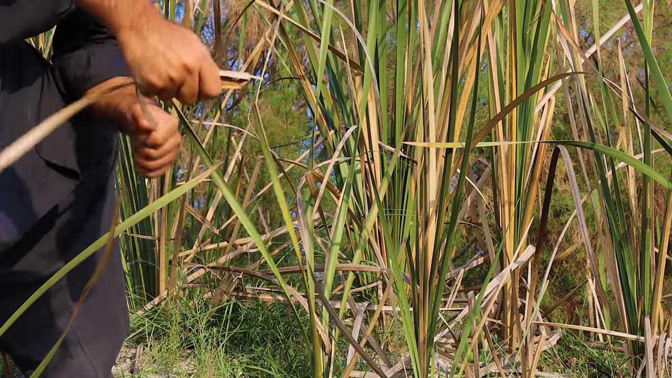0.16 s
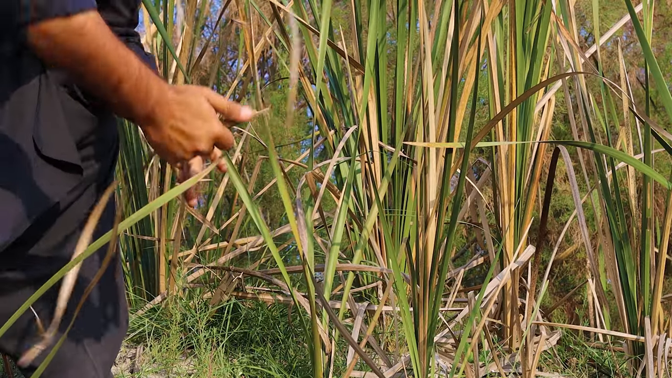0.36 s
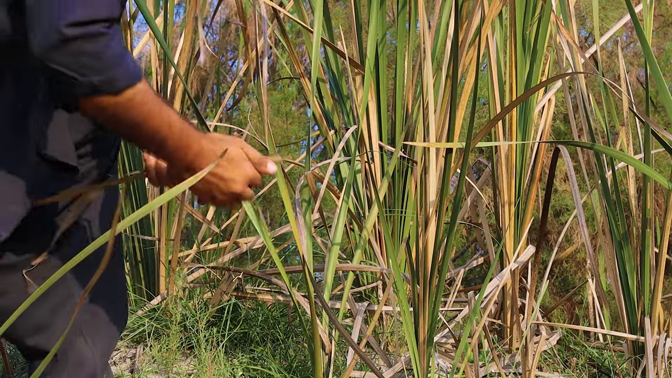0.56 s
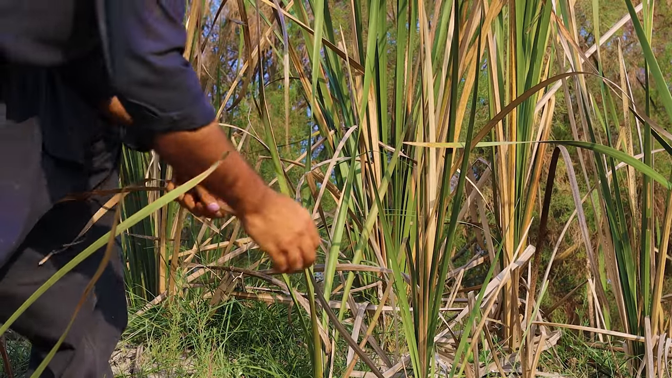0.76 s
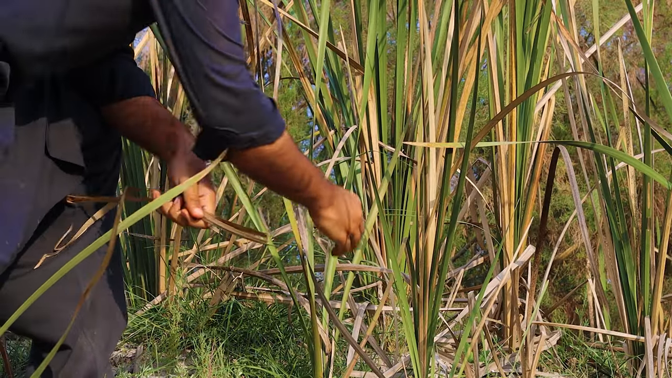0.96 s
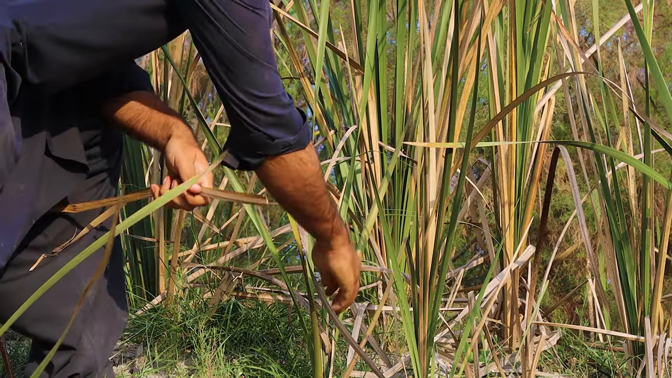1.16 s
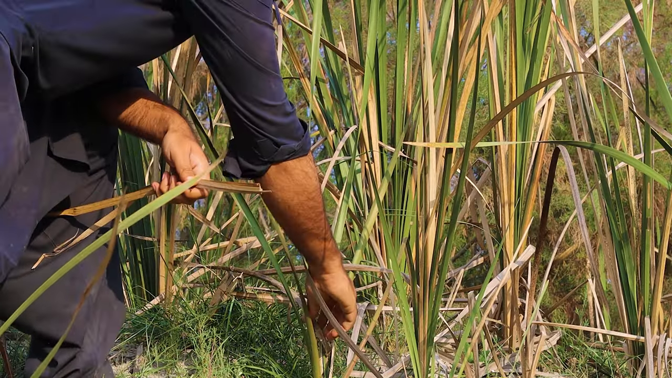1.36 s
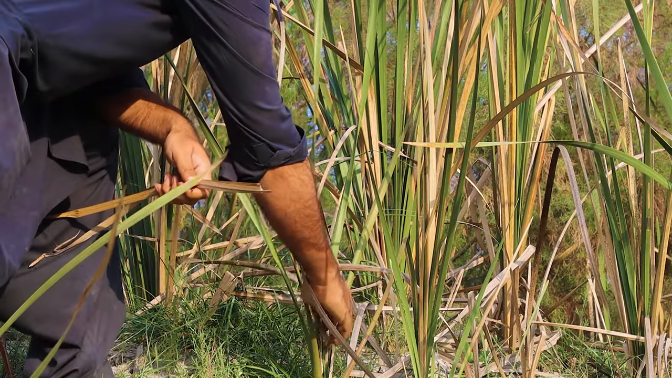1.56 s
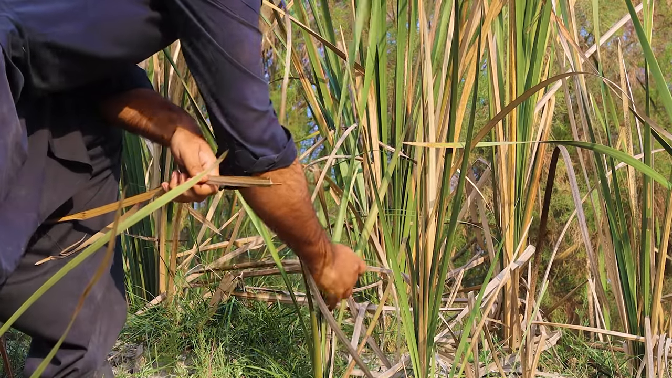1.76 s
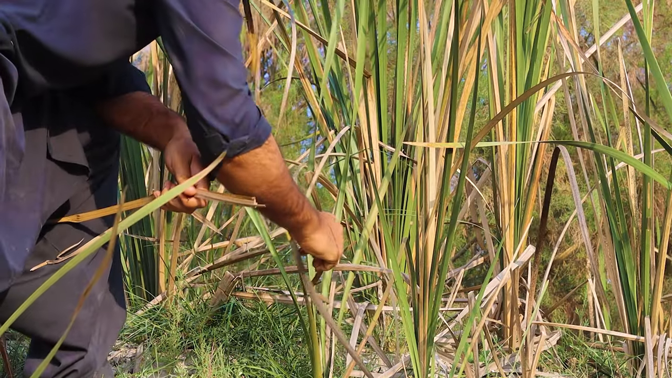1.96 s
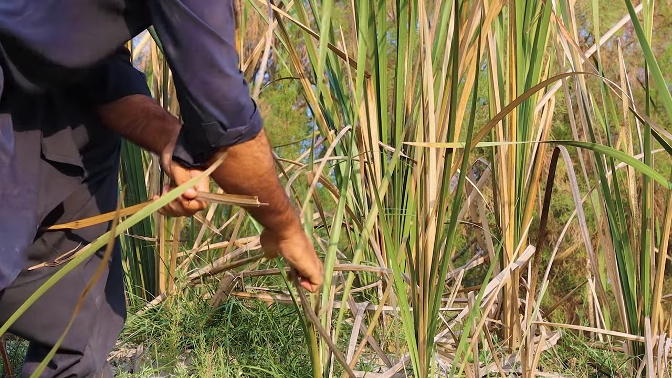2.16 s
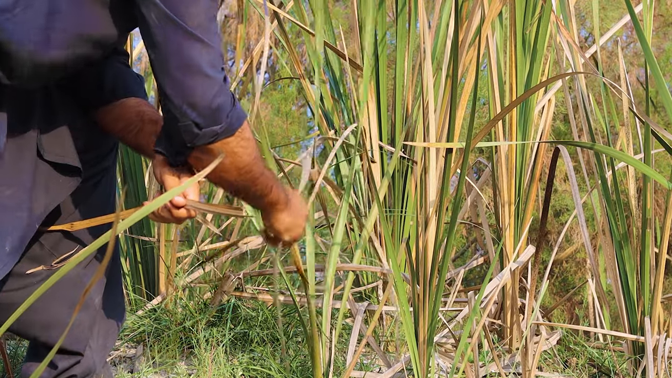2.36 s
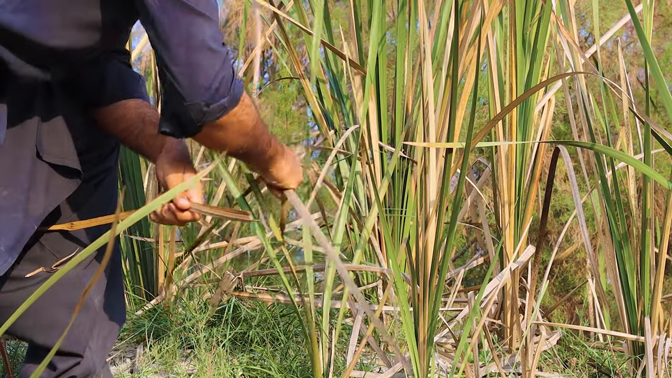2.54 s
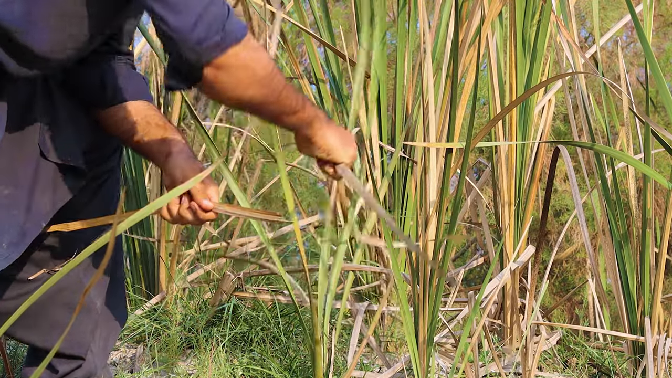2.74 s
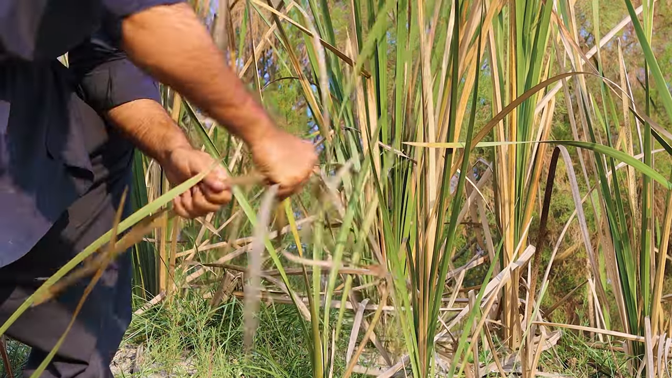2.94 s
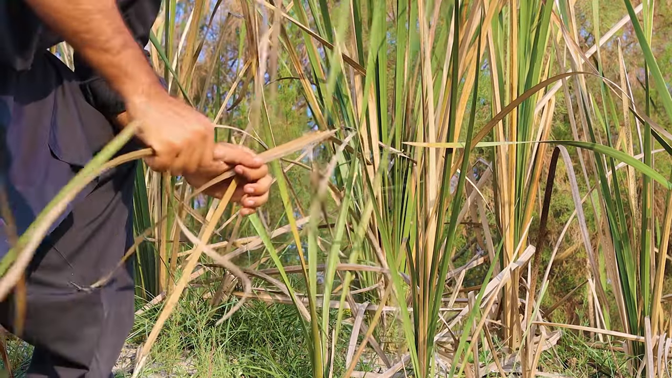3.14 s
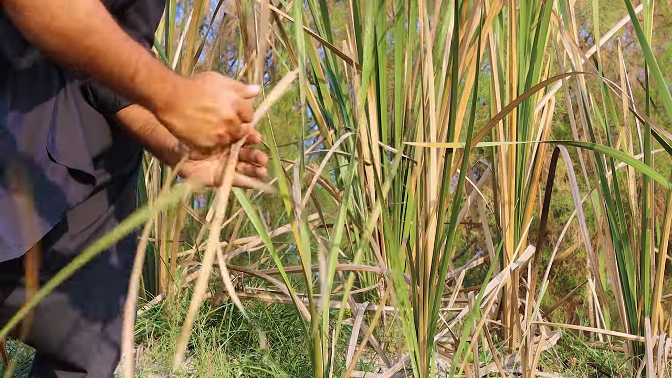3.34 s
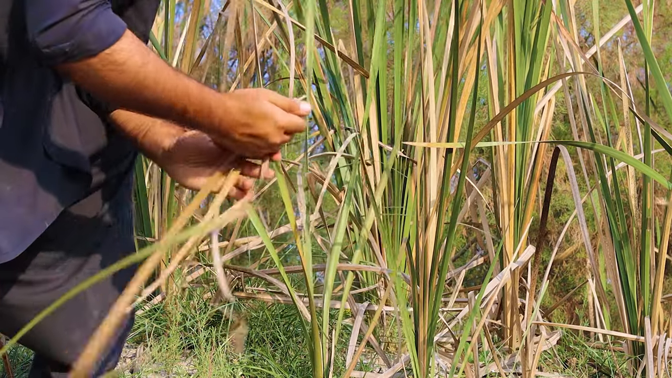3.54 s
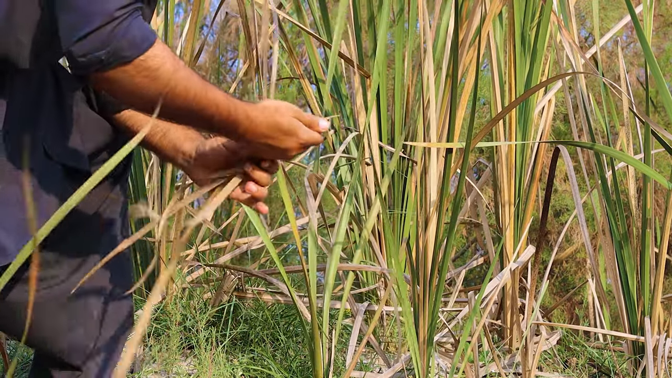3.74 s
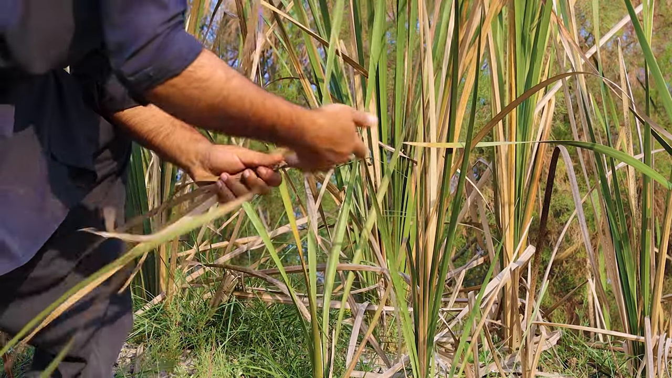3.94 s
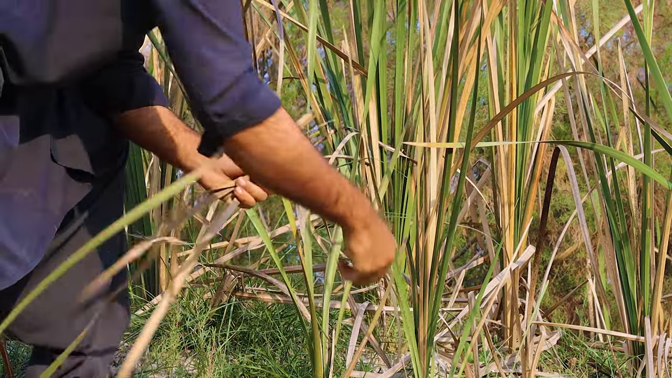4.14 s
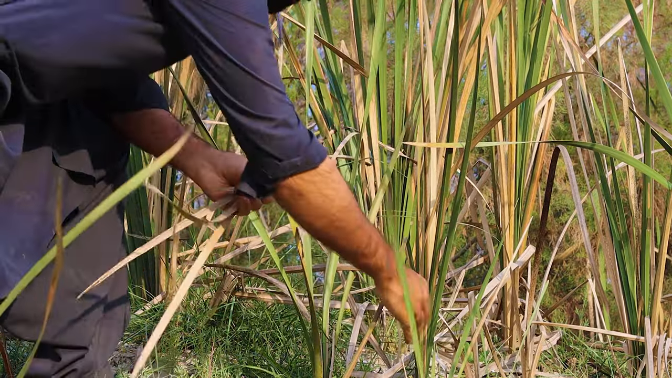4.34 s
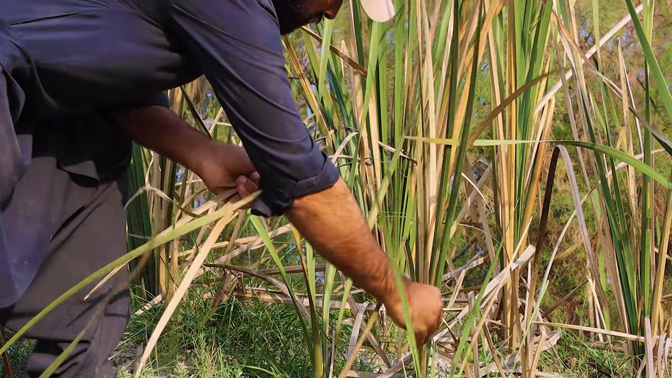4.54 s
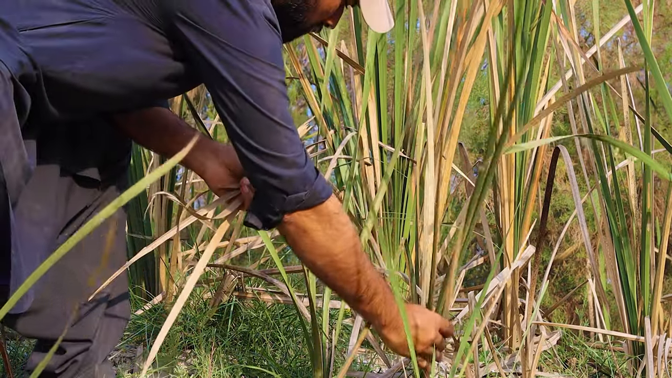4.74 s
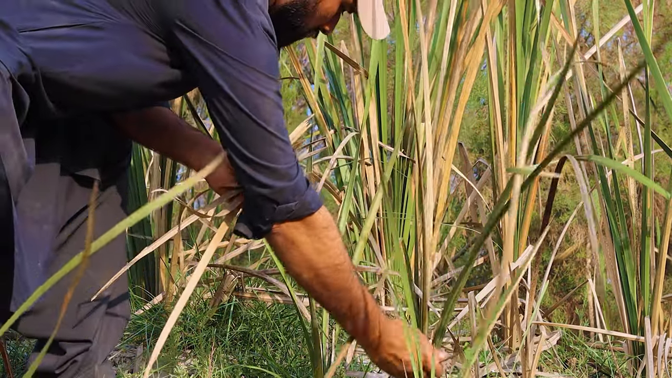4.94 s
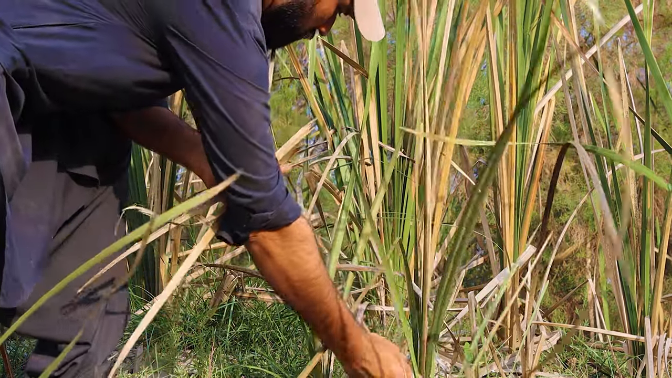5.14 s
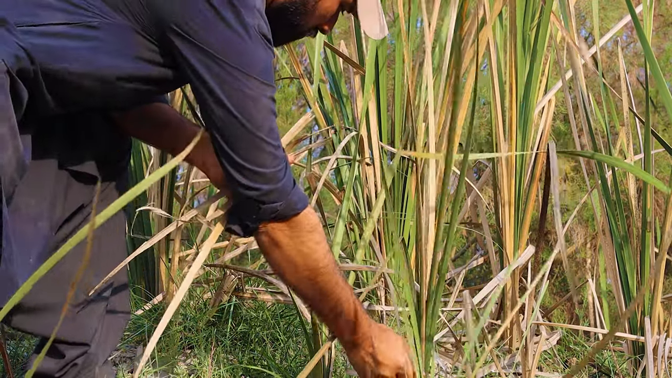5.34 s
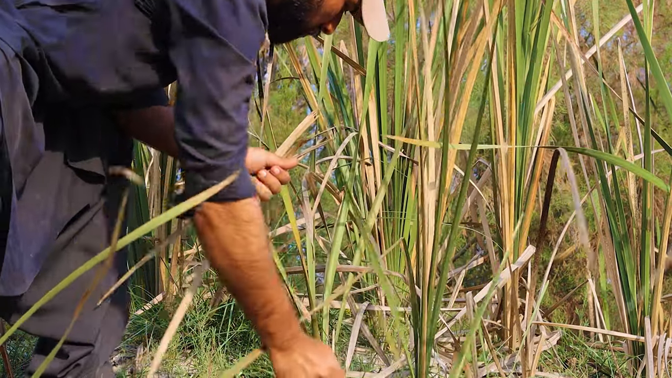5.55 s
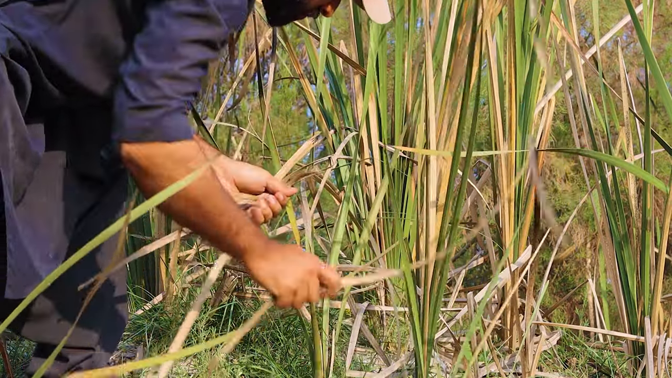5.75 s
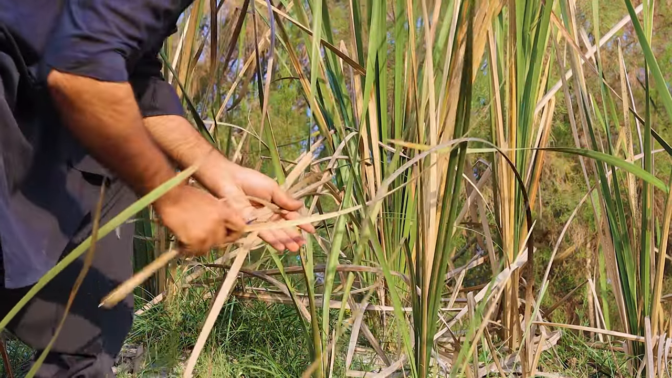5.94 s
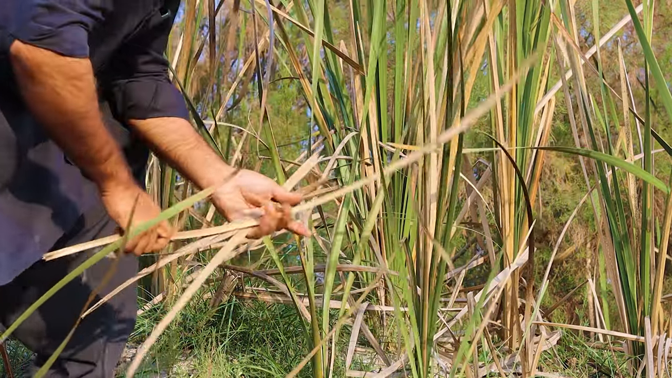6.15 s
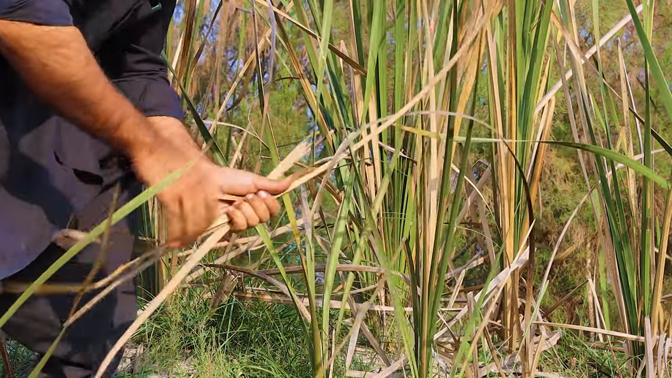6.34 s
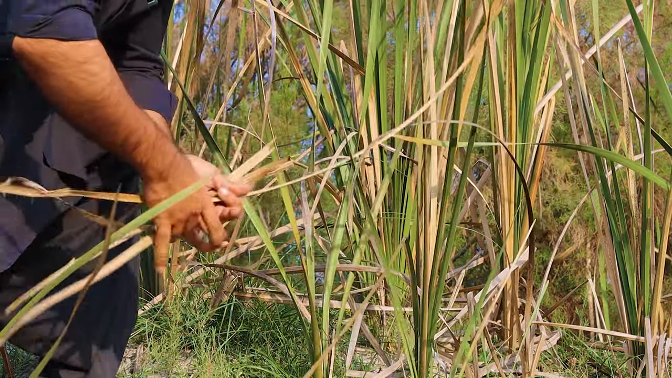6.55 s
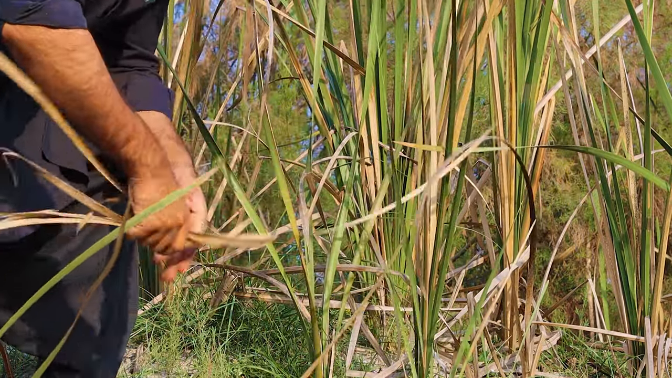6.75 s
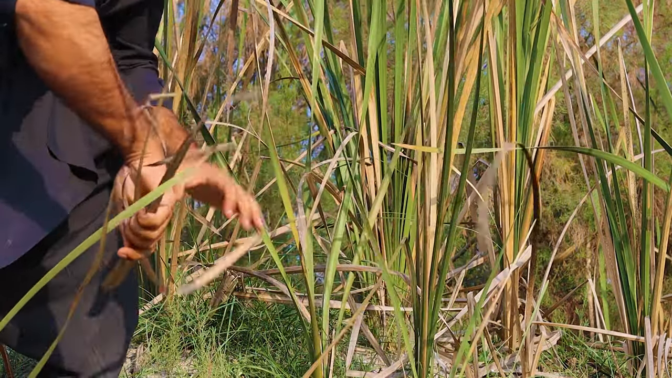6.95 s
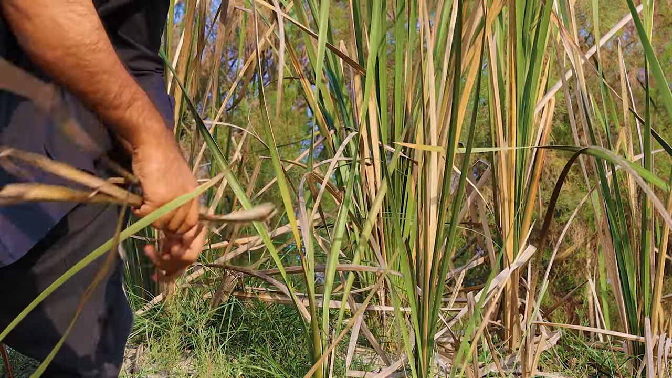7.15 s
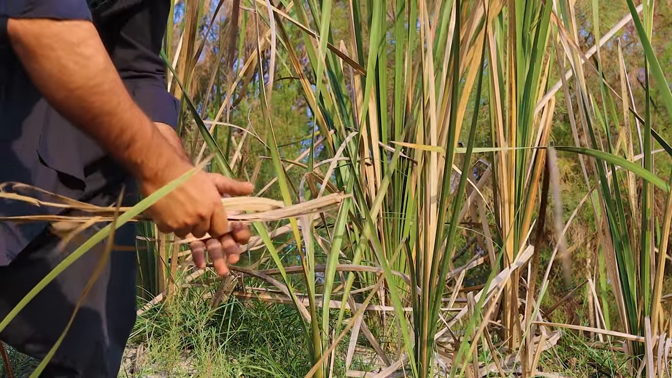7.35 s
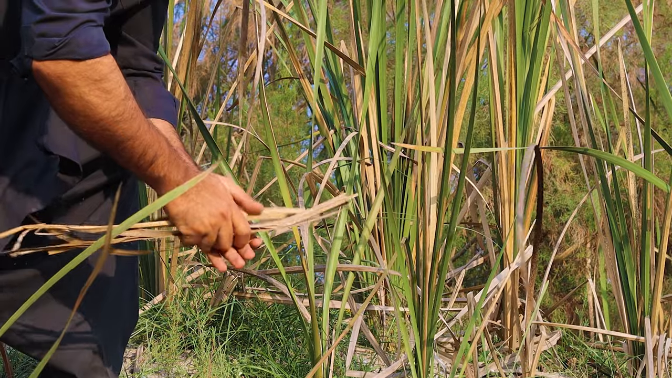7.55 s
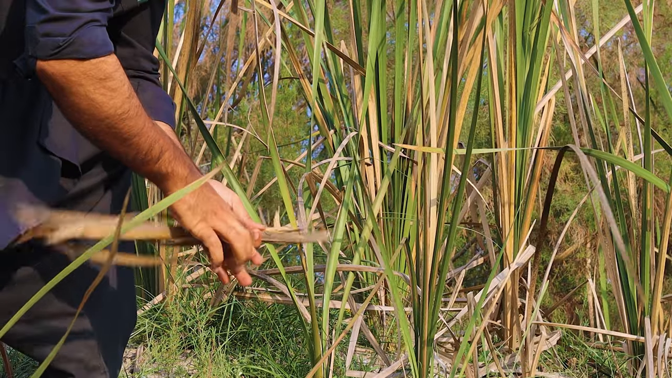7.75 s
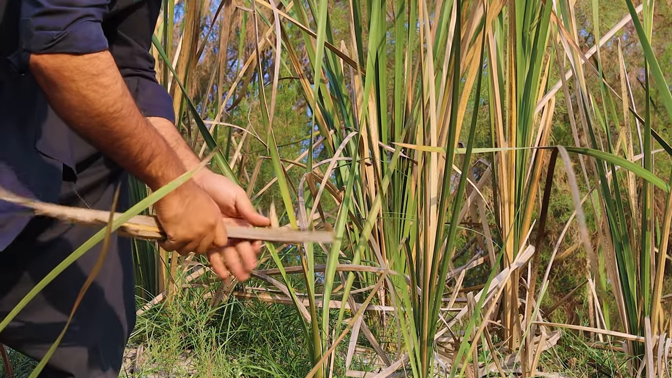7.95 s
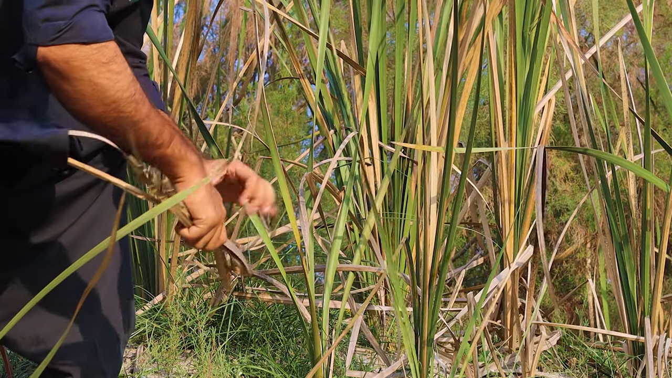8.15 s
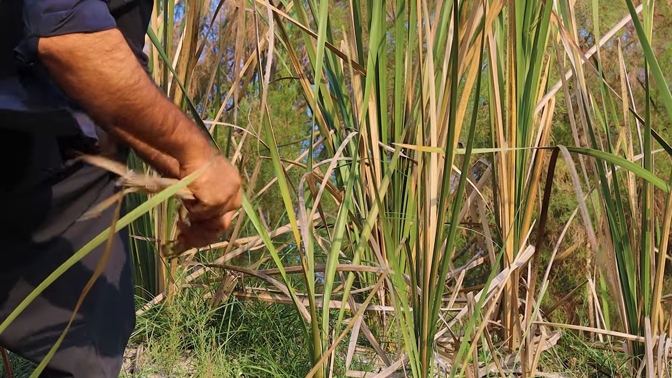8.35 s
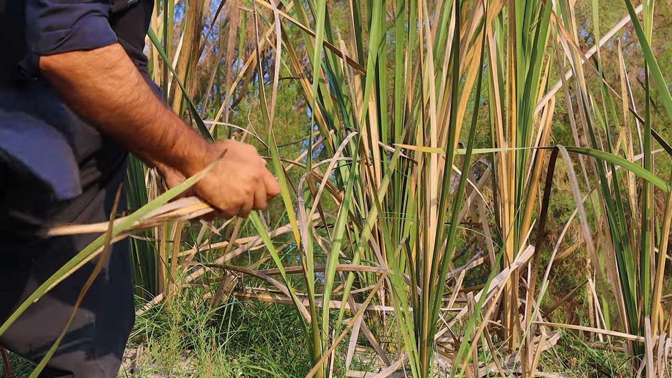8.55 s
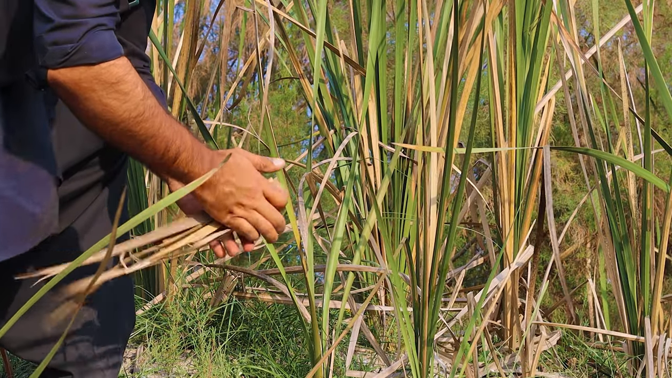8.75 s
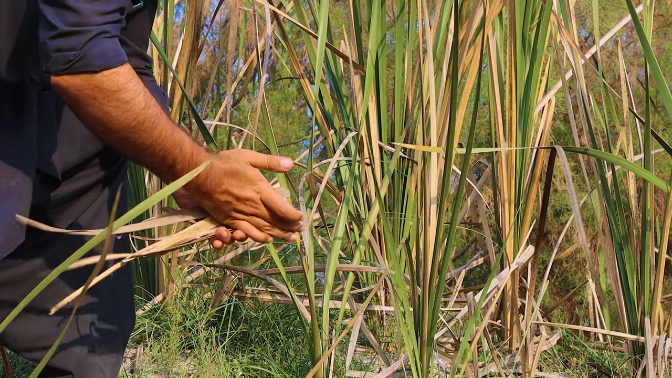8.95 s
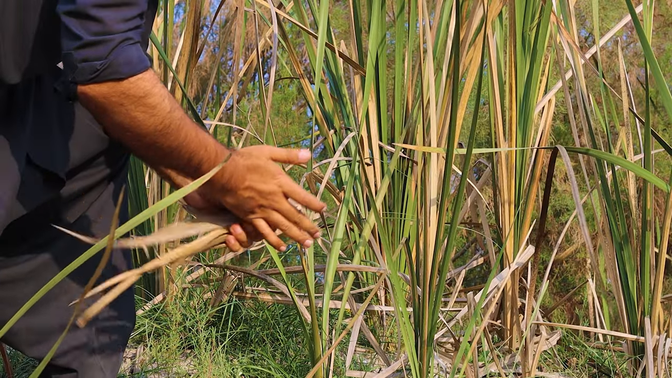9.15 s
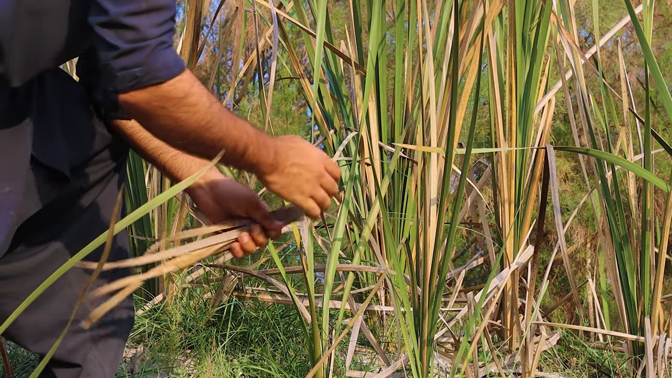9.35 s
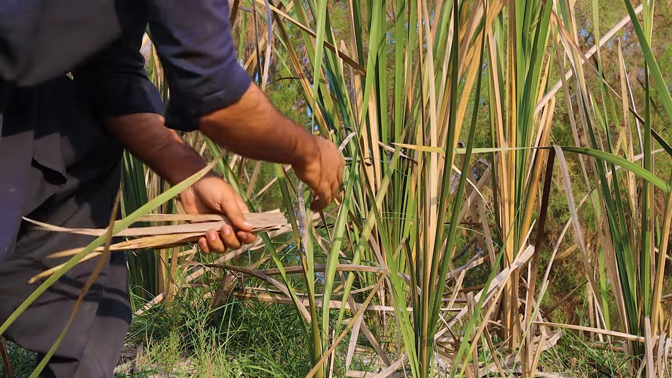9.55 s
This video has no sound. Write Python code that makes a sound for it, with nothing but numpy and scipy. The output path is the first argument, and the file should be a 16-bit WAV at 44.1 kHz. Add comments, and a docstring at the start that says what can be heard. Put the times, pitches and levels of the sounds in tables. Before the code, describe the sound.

Dry reed leaves rustle, crackle and snap as hands pull and bundle them outdoors, with small bird chirps and a faint distant engine thumping.

```python
"""Outdoors at a stand of dry reeds, leaves are pulled, broken and folded into a bundle by hand.
Blades scrape and crackle by stick-slip friction; breaking ribs ring and crack, thick stalks knock.
One leaf is torn out with a low crunch and others scrape hollowly along a stalk. A small bird whistles
in falling glides now and then, and far away a slow engine, probably a one-cylinder pump, thumps
steadily as filtered pulses. Coloured noise makes the outdoor rumble and the faint hiss of the reed bed."""
import sys
import numpy as np
from scipy import signal
from scipy.fft import rfft, irfft
from scipy.io import wavfile
from scipy.ndimage import uniform_filter1d, map_coordinates

SR = 44100
rng = np.random.default_rng(int(sys.argv[2]) if len(sys.argv) > 2 else 0)


def generate_wav(sig):
    """Save sig (samples, or channels by samples) to the path in sys.argv[1] as 16-bit PCM at SR."""
    pcm = np.round(np.clip(np.atleast_2d(sig).T, -1, 1) * 32767).astype(np.int16)
    wavfile.write(sys.argv[1], SR, pcm)


N = 427769
TIME = np.arange(N) / SR


def from_db(db):
    """Level to amplitude: 20 dB is a factor of ten."""
    return 10 ** (np.asarray(db) / 20)


def rms_one(x):
    """Normalization to unit root-mean-square."""
    return x / np.sqrt(np.mean(x ** 2) + 1e-20)


def band(x, low_hz, high_hz, order=2):
    """Causal Butterworth band-pass."""
    sos = signal.butter(order, [low_hz, min(high_hz, .45 * SR)], "band", fs=SR, output="sos")
    return signal.sosfilt(sos, x)


def colour(x, points, size=4096):
    """Minimum-phase filtering: the folded cepstrum of a (frequency [Hz], gain [dB]) table is causal."""
    hz, db = np.transpose(points)
    grid = np.maximum(np.arange(size // 2 + 1) * SR / size, 1)
    gain_db = np.interp(np.log(grid), np.log(hz), db)
    cepstrum = irfft(np.log(from_db(gain_db)))
    cepstrum[1:size // 2] *= 2
    cepstrum[size // 2 + 1:] = 0
    impulse_response = irfft(np.exp(rfft(cepstrum)))
    return signal.fftconvolve(x, impulse_response)[:len(x)]


# sideways scattering by the stalks: (frequency [Hz], gain of side against mid [dB])
SCATTER_WIDTH = [(80, -14.5), (300, -7.5), (4000, -8.5), (9000, -1.5)]


def stereo(mid, side):
    """Mid-side stereophony: direct sound in the middle, scattered sound in antiphase."""
    return mid + colour(side, SCATTER_WIDTH) * np.array([[1], [-1]])


def drift(rate):
    """Slow random modulation: chance values, `rate` per second, joined by lines; rms 1."""
    knots = rng.standard_normal(int(N / SR * rate) + 2)
    return rms_one(np.interp(TIME * rate, np.arange(len(knots)), knots))


def add(out, s, db, sound):
    """Equal-energy scaling: the mid of a short sound gets the energy of 15 ms at the given level."""
    at = int(s * SR)
    level = np.sqrt(np.sum(sound[0] ** 2) / (.015 * SR))
    out[:, at:at + sound.shape[1]] += from_db(db) * sound / level


# time constants: a stroke takes hold quickly; the leaves settle after it
ATTACK_S, RELEASE_S = 0.0053, 0.018


def stroke(start, length, swell_db=0):
    """Exponential rise and decay around a hold whose level swells or fades linearly in dB with the pull."""
    held = np.clip(TIME - start, 0, length)
    before = np.maximum(start - TIME, 0) / ATTACK_S
    after = np.maximum(TIME - start - length, 0) / RELEASE_S
    swell = np.log(10) / 20 * swell_db * (held / length - .5)
    return np.exp(swell - np.minimum(before + after, 20))


def fracture(tear_s, first_crack, scatter_db, scatter_s, size=2600):
    """Impulsive release of strain: a first crack, then tearing fibres and scattering stalks; mid and side."""
    age = TIME[:size]
    fibres = rng.standard_normal((2, size)) * from_db(2 * rng.standard_normal(size))
    force = fibres * (np.exp(-age / tear_s) + from_db(scatter_db) * np.exp(-age / scatter_s))
    force[0, 0] = first_crack
    return force


CONTACT_S = .2   # how long one leaf keeps rubbing on another


def rustle(spectrum, slips_per_s, size_db, clump_db, splinter_s, rub, low_hz, high_hz, count=9):
    """Stick-slip friction: dry edges catch and slip, each brief contact rings at a new pitch; mid level 1."""
    span = int(CONTACT_S * SR)
    age = TIME[:512]
    starts = np.arange(0, N + span, span // count)

    # random slips over steady rubbing, gathered into clumps
    sizes = from_db(size_db * np.minimum(rng.exponential(1, N), 2.6)) * rng.choice([-1, 1], N)
    slips = rms_one(sizes * (rng.random(N) < slips_per_s / SR))
    rubbing = rub * rng.standard_normal(N)
    clumps = from_db(clump_db * np.tanh(drift(65)))
    friction = np.pad((slips + rubbing) * clumps, span)
    leaf_of = rng.integers(0, count, len(friction))

    # each contact draws its pitch from one of `count` steps between low_hz and high_hz
    step = (np.arange(len(starts)) % count + rng.random(len(starts))) / count
    pitches = low_hz * (high_hz / low_hz) ** step[:, None, None]
    decay = np.exp(-age / splinter_s) + 0.16 * np.exp(-age / 0.0059)
    splinters = rng.standard_normal((len(starts), 2, len(age))) * decay
    resonances = np.exp(-age * pitches / 2) * np.cos(2 * np.pi * pitches * age)
    rings = signal.fftconvolve(splinters, resonances, axes=2)[..., :len(age)]

    sound = np.zeros((2, len(friction) + len(age)))
    pressure = np.sin(np.linspace(0, np.pi, span))
    for k, at in enumerate(starts):
        push = pressure * friction[at:at + span] * (leaf_of[at:at + span] == k % count)
        response = rms_one(splinters[k]) + .5 * rms_one(rings[k])
        sound[:, at:at + span + len(age) - 1] += signal.fftconvolve(push[None], response, axes=1)
    mid, side = (colour(part, spectrum) for part in sound[:, span:span + N])
    # the hand, not the single slip, sets the strength of a stroke
    running_power = uniform_filter1d(mid ** 2, int(.07 * SR))
    return stereo(mid, side) / np.sqrt(running_power + 1e-12)


# where the hands work: (time [s], reach [0 in front to 1 well to the right])
HAND_REACH = [(.5, 0.31), (3.5, 0.45), (5.1, 1), (6.5, 0.21)]


def hand_reach():
    """Source position as a function of time, by linear interpolation."""
    return np.interp(TIME, *np.transpose(HAND_REACH))


AIR_DB = -54.5   # about which the level drifts
# colour of the outdoor air: (frequency [Hz], relative density [dB per Hz])
AIR_COLOUR = [(24, -27), (42, 3), (90, -1), (170, -13), (310, -9.5), (450, -15), (1500, -23.5), (2500, -19),
              (11500, -34.5), (16000, -48)]


def air():
    """Broadband noise with a steep spectrum: far outdoor rumble and the faint hiss of the reed bed."""
    mid, side = (rms_one(colour(white, AIR_COLOUR)) for white in rng.standard_normal((2, N)))
    return from_db(AIR_DB + 0.96 * drift(6.8)) * stereo(mid, side)


BLADE_TRIM_DB, SHEATH_TRIM_DB = 1, 0.5   # added to the tabled levels
BRUSHING_SHEATH_DB = -10.5   # against the blades, before the trims
# held leaves brush the stand and the clothes: (time [s], blade level before trim [dB])
BRUSHING_LEVEL = [(0.0, -47), (1.35, -54.5), (2.3, -45), (3.45, -53), (5.35, -53), (5.8, -48), (8.9, -47),
                  (9.35, -53), (9.7, -59.5)]
# leaf over leaf: (start [s], length [s], blade level midway before trim [dB],
#                  sheaths against blades before trim [dB], swell from start to end [dB])
LEAF_STROKES = [(0.025, 0.12, -42.5, -8.5, -4), (0.295, 0.11, -49.5, -13.0, 11),
                (0.485, 0.18, -44.5, -13, 3), (0.884, 0.069, -41, -12.5, 6), (1.673, 0.39, -47, -11.5, -5),
                (1.962, 0.11, -38.5, -13, -7.5), (2.27, 0.032, -38.5, -21, -3),
                (2.388, 0.27, -42, -13.5, -7.5), (2.675, 0.16, -37, -8.0, -16.5),
                (2.809, 0.144, -31, -15, 13.5), (2.958, 0.17, -39.5, -7.5, -15),
                (3.166, 0.23, -49.5, -6.5, -2), (3.54, 0.12, -45, -11, 0), (3.715, 0.22, -45, -16, -8),
                (3.955, 0.083, -40.5, -11.5, -9), (4.804, 0.17, -48, -10.5, 6.5),
                (4.994, 0.18, -38.5, -10, -0.5), (5.443, 0.1, -39.5, -13, 7), (5.566, 0.33, -46, -8, -6),
                (6.021, 0.14, -47.5, -12.5, 14), (6.265, 0.22, -44.5, -15.5, -1.5),
                (6.666, 0.15, -38.5, -15.5, 5), (6.936, 0.11, -44.5, -7.5, 2),
                (7.107, 0.022, -40, -16.5, 15), (7.234, 0.018, -43.5, -10, 18.5),
                (7.397, 0.15, -43, -14.5, 12.5), (7.644, 0.16, -40, -14.5, 8),
                (7.897, 0.14, -38.5, -21.5, 5.5), (8.344, 0.14, -42, -9.5, -12.5),
                (8.532, 0.23, -42.5, -15.5, 5.5), (8.833, 0.15, -44.5, -9.5, -25),
                (9.012, 0.041, -36, -19, -3), (9.159, 0.065, -43, -12, 2)]
# colour of the thin blades: (frequency [Hz], relative density [dB per Hz])
BLADE_COLOUR = [(900, -33), (1900, -2.5), (2600, -1.5), (3200, -5), (4600, 0), (7500, 1), (9000, -4.5),
                (11900, -0.5), (13000, -7.5), (16000, -17.5)]
# colour of the stiffer sheaths: (frequency [Hz], relative density [dB per Hz])
SHEATH_COLOUR = [(130, -7), (550, 3.5), (2100, 3), (3500, -5.5), (8000, -12)]
# leaves of the stand, to the right, hiss higher than the bundle: (frequency [Hz], gain [dB])
STANDING_COLOUR = [(4000, 1.5), (5500, -3), (15000, 4.5)]


def reeds():
    """Friction excitation: each hand stroke drives fine crackle in blades and a coarser rasp in sheaths."""
    blade_power = from_db(np.interp(TIME, *np.transpose(BRUSHING_LEVEL))) ** 2
    sheath_power = blade_power * from_db(BRUSHING_SHEATH_DB) ** 2
    for start, length, db, sheath_db, swell_db in LEAF_STROKES:
        power = (from_db(db) * stroke(start, length, swell_db)) ** 2
        blade_power += power
        sheath_power += power * from_db(sheath_db) ** 2

    blades = rustle(BLADE_COLOUR, slips_per_s=520, size_db=3.5, clump_db=3.0, splinter_s=0.00095,
                    rub=0.84, low_hz=2555, high_hz=10800)
    standing = np.array([colour(ear, STANDING_COLOUR) for ear in blades])
    reach = hand_reach()
    blades = (1 - reach) * blades + reach * standing
    sheaths = rustle(SHEATH_COLOUR, slips_per_s=600, size_db=5.0, clump_db=4.0, splinter_s=0.00087,
                     rub=0.64, low_hz=839, high_hz=3000)
    blades = blades * np.sqrt(blade_power) * from_db(BLADE_TRIM_DB)
    return blades + sheaths * np.sqrt(sheath_power) * from_db(SHEATH_TRIM_DB)


# thicker ribs ring lower and crack harder: crack equals ring at this pitch
EVEN_CRACK_HZ, CRACK_DB_PER_OCTAVE = 2440, -7.5
# breaks of leaf ribs and stalks: (time [s], ring level of the broken piece [dB], ring band centre [Hz])
RIB_BREAKS = [(.0584, -33.5, 6530), (0.541, -46, 1240), (.5628, -36, 6960), (0.7155, -35.5, 4680),
              (.7431, -36, 4860), (.7784, -39.5, 9000), (.793, -35.5, 8200), (0.905, -41.5, 2200),
              (1.235, -49, 4500), (1.419, -50, 4260), (1.5663, -35, 10180), (1.97, -30.5, 7700),
              (2.1948, -38, 3470), (2.49, -32.5, 7300), (2.6761, -25.5, 2100), (2.8142, -40, 5770),
              (2.9133, -28, 4940), (2.937, -27, 6000), (2.9589, -18, 6160), (3.5675, -25, 9350),
              (3.6362, -39, 3380), (3.6476, -34, 7100), (3.7156, -37.5, 6000), (3.8788, -39.5, 7100),
              (3.974, -38, 3660), (4.046, -38, 2500), (4.9969, -30.5, 2110), (5.209, -29.5, 7100),
              (5.305, -30, 3200), (5.319, -33, 2880), (5.4457, -30.5, 6520), (5.467, -20, 2440),
              (6.045, -40, 4100), (6.1309, -30, 7400), (6.14, -30, 8300), (6.375, -41, 4900),
              (6.397, -39, 3440), (6.4872, -38, 2770), (6.719, -41.5, 2830), (6.7494, -30, 4940),
              (6.9819, -37.5, 2510), (7.027, -39, 4620), (7.3961, -27.5, 2140), (7.5245, -33, 4700),
              (7.723, -40, 1140), (7.963, -36, 4200), (7.989, -25, 5300), (8.014, -33.5, 4980),
              (8.2545, -41, 4300), (8.3665, -20, 5530), (8.4056, -29.5, 8080), (8.419, -30, 6700),
              (8.4382, -22, 4970), (8.585, -37.5, 2300), (8.595, -28, 6040), (8.8866, -29, 6240),
              (9.0058, -27, 7700), (9.0135, -33, 3000), (9.0357, -29.5, 4600), (9.05, -26.5, 4600),
              (9.0682, -22.5, 2700), (9.1483, -37, 2600), (9.484, -41, 5300), (9.5427, -42.5, 2920)]


def snaps():
    """Brittle fracture: a short ring of the broken piece and a broad crack that grows with thickness."""
    out = np.zeros((2, N + SR))
    for s, ring_db, ring_hz in RIB_BREAKS:
        crack_db = ring_db + CRACK_DB_PER_OCTAVE * np.log2(ring_hz / EVEN_CRACK_HZ)
        crack = fracture(tear_s=0.0053, first_crack=3.3, scatter_db=-8, scatter_s=0.0048)
        ring = fracture(tear_s=0.0017, first_crack=10.1, scatter_db=-9, scatter_s=0.0098)
        add(out, s, crack_db, band(crack, 1760, 9700))
        add(out, s, ring_db, band(ring, ring_hz / 1.2, ring_hz * 1.2, order=1))
    return stereo(*out[:, :N])


FIRINGS_PER_S, FIRST_FIRING_S = 8.969, .0885


def engine(level_db, low_hz, high_hz, dull_hz):
    """Periodic pulse excitation: one exhaust puff per firing, of which only the bass carries this far."""
    times = np.arange(FIRST_FIRING_S, N / SR - .01, 1 / FIRINGS_PER_S)
    times = times + rng.normal(0, .0008, len(times))
    puffs = np.zeros(N)
    puffs[(times * SR).astype(int)] = -from_db(rng.normal(0, 1, len(times)))
    bass = band(puffs + 1e-18, low_hz, high_hz)
    thumps = signal.sosfilt(signal.butter(2, dull_hz, fs=SR, output="sos"), bass)
    return from_db(level_db) * rms_one(thumps)


LOW_MODE_HZ, UPPER_MODE_HZ = 246, 820   # band centres of a thick stalk's modes
# thick stalks giving way or being bumped:
# (time [s], level [dB], power share of the upper mode before the last filter [0-1])
STALK_KNOCKS = [(0.239, -40, 0), (1.144, -48.5, 1), (2.677, -35.5, 0.25), (2.957, -43, 0.4),
                (4.9974, -44, 1), (5.467, -28.5, 0.93), (7.3968, -25.5, 0.94)]


def knocks():
    """Modal excitation: a blow on a thick stalk sounds dully in two damped modes."""
    out = np.zeros((2, N + SR))
    for s, db, upper in STALK_KNOCKS:
        force = fracture(tear_s=0.0024, first_crack=25.0, scatter_db=-2, scatter_s=0.006)
        low = rms_one(band(force, LOW_MODE_HZ / 1.45, LOW_MODE_HZ * 1.45, order=1))
        high = rms_one(band(force, UPPER_MODE_HZ / 1.45, UPPER_MODE_HZ * 1.45, order=1))
        # a harder blow favours the upper mode and reaches higher
        top_hz = 500 + 1300 * upper
        blend = np.sqrt(1 - upper) * low + np.sqrt(upper) * high
        add(out, s, db, band(blend, 130, top_hz))
    return stereo(*out[:, :N])


FALL_S, SWING_S = 0.039, 0.0207   # a call falls to its lowest note, swings up and hooks over
# calls, pitches before smoothing: (time of the lowest note [s], first pitch [Hz], lowest pitch [Hz],
#                                   swing back up [Hz], level before wavering [dB])
BIRD_CALLS = [(0.589, 3910, 2570, 850, -44.5), (2.14, 3900, 2800, 480, -40), (2.402, 3700, 3350, 640, -42),
              (4.403, 3400, 2800, 0, -50), (4.903, 4770, 2820, 1000, -39), (7.246, 4950, 3230, 580, -34),
              (8.332, 3900, 2670, 0, -39), (8.975, 3920, 2580, 0, -38)]


def bird():
    """Frequency modulation: wavering sine glides fall, often swing up, and echo faintly from the reed bed."""
    out = np.zeros(N)
    for s, first_hz, low_hz, swing_hz, db in BIRD_CALLS:
        end_s = 2 * SWING_S if swing_hz > 100 else SWING_S / 2
        age = np.arange(-FALL_S, end_s, 1 / SR)
        corners_hz = [first_hz, low_hz, low_hz + swing_hz, low_hz]
        pitch = np.interp(age, [-FALL_S, 0, SWING_S, 2 * SWING_S], corners_hz)
        pitch = uniform_filter1d(pitch, int(SWING_S / 2 * SR))
        envelope = np.abs(np.sin(np.pi * np.linspace(0, 1, len(age)) ** 1.15)) ** 0.82
        whistle = np.sin(2 * np.pi * np.cumsum(pitch) / SR) * envelope
        at = int((s - FALL_S) * SR)
        out[at:at + len(whistle)] += from_db(db) * whistle
    out *= from_db(2 * drift(160))
    # one echo for each channel
    echoes = np.array([np.interp(TIME - lag_s, TIME, out) for lag_s in (.031, .043)])
    return out + from_db(-14) * echoes


TEAR_START_S, TEAR_LENGTH_S = 2.69, 0.41
TEAR_DB, TEAR_SWELL_DB = -54, -17   # midway level; change from start to end
# colour of the low crunch: (frequency [Hz], relative density [dB per Hz])
CRUNCH_COLOUR = [(110, -12), (400, -8), (1500, -10)]


def tear():
    """Successive fibre rupture: thick fibres part in a fading crunch as a leaf is torn out at its base."""
    fibres = rustle(CRUNCH_COLOUR, slips_per_s=470, size_db=0.0, clump_db=-2.0, splinter_s=0.0022,
                    rub=1.0, low_hz=248, high_hz=820, count=4)
    return from_db(TEAR_DB) * stroke(TEAR_START_S, TEAR_LENGTH_S, TEAR_SWELL_DB) * fibres


# a leaf slides along a stalk: (start [s], length [s], level [dB])
STALK_SCRAPES = [(3.87, 0.21, -47), (4.18, 0.14, -43.5), (9.085, 0.21, -55.5)]
# resonances of the leaf in a hollow scrape: (frequency [Hz], relative density [dB per Hz])
SCRAPE_COLOUR = [(1700, -17), (2150, 1.5), (2370, -8), (2650, 4.5), (3150, -7), (6300, -8), (7600, 1),
                 (9500, -22)]


def scrapes(flutter_db):
    """Friction noise through resonances: uneven grains of catch and slip excite one leaf."""
    grains = from_db(flutter_db * drift(150))
    mid, side = (rms_one(colour(white * grains, SCRAPE_COLOUR)) for white in rng.standard_normal((2, N)))
    strength = sum(from_db(db) * stroke(start, length) for start, length, db in STALK_SCRAPES)
    return strength * stereo(mid, side)


def scene():
    """Interaural time and level difference: reaching right makes the near sounds later and weaker at left."""
    left, right = reeds() + tear() + snaps() + knocks() + scrapes(flutter_db=2.5)
    reach = hand_reach()
    delay_s = reach * 3.5e-5
    left = map_coordinates(left, [np.arange(N) - delay_s * SR], order=3)
    # at full reach the left loses 1 dB and the right gains 1 dB
    near = np.array([left, right]) * from_db(1.0 * reach * np.array([[-1], [1]]))
    far_engine = engine(level_db=-51, low_hz=77.3, high_hz=116.8, dull_hz=131)
    return near + bird() + far_engine + air()


CUTOFF_HZ = 16000


def record(dry):
    """Overload and band limiting: peaks beyond 0.8 are clipped, then a steep low-pass cuts the top."""
    low_pass = signal.ellip(10, .2, 80, CUTOFF_HZ, fs=SR, output="sos")
    return signal.sosfilt(low_pass, np.clip(dry, -.8, .8))


dry = scene()
out = record(dry)
generate_wav(out)
```